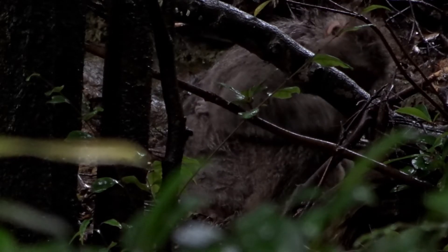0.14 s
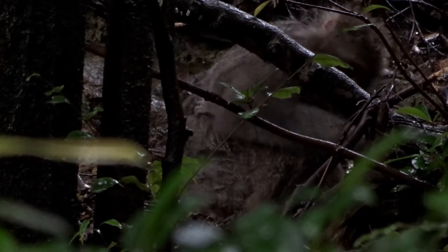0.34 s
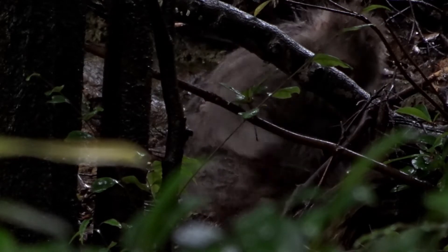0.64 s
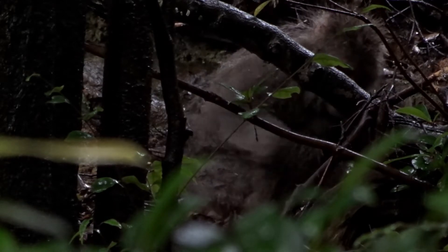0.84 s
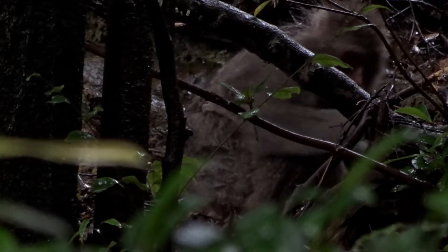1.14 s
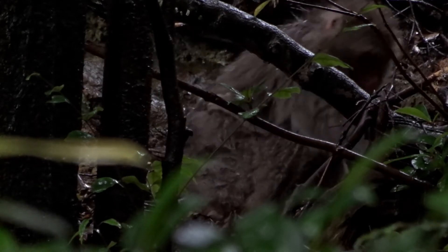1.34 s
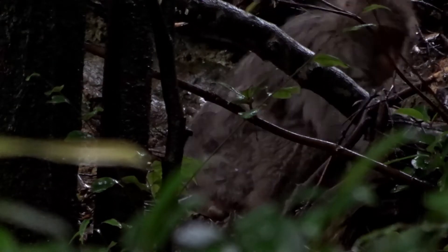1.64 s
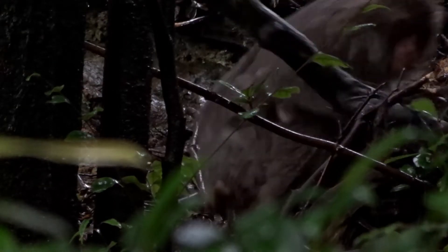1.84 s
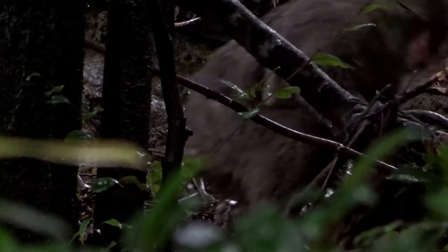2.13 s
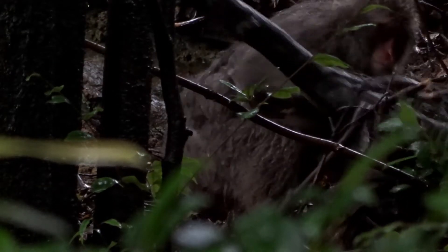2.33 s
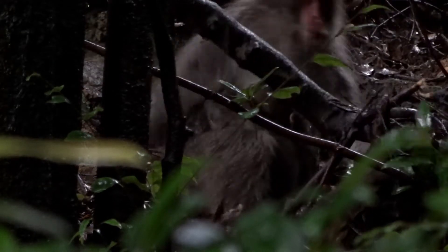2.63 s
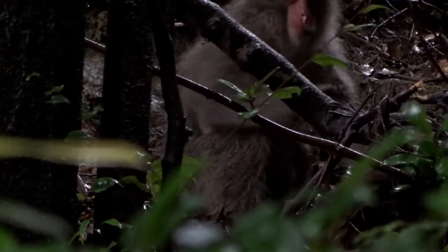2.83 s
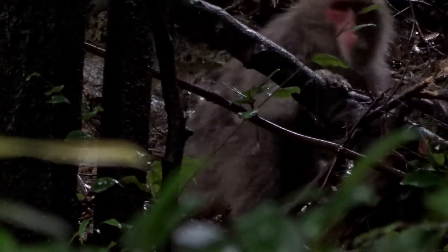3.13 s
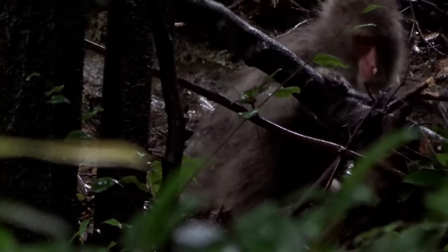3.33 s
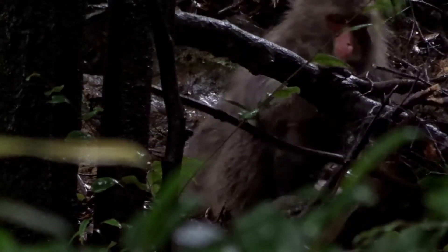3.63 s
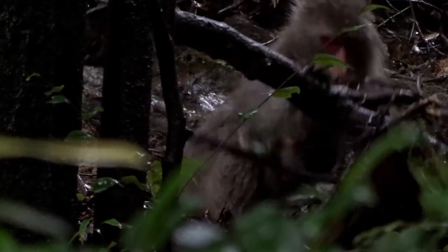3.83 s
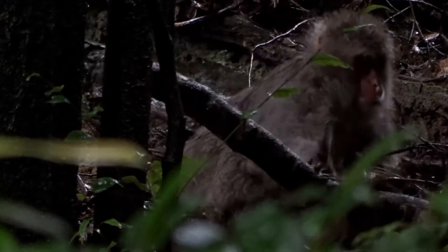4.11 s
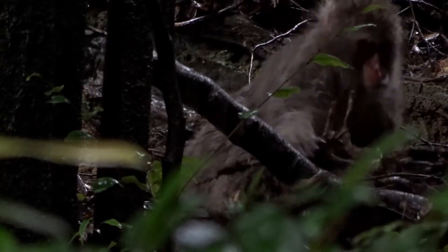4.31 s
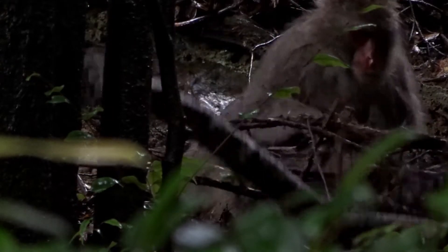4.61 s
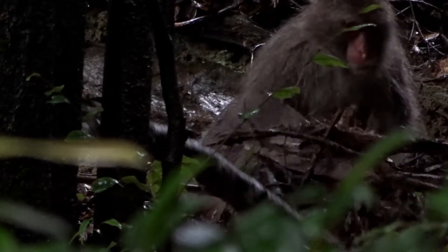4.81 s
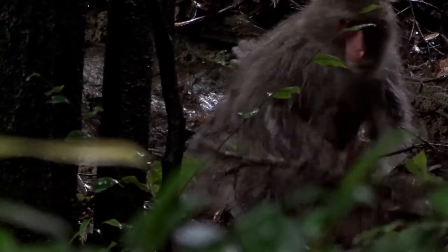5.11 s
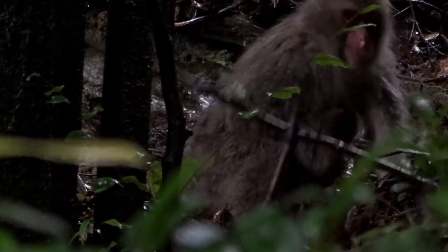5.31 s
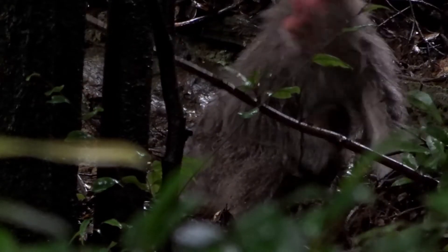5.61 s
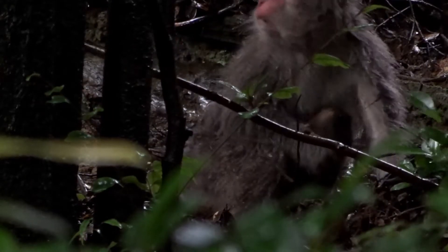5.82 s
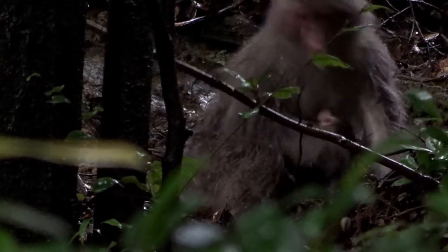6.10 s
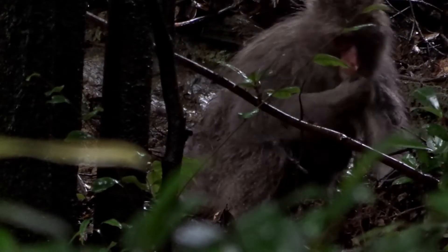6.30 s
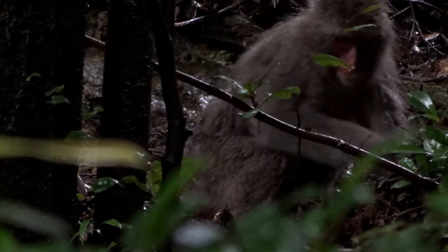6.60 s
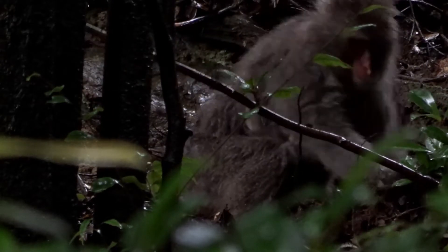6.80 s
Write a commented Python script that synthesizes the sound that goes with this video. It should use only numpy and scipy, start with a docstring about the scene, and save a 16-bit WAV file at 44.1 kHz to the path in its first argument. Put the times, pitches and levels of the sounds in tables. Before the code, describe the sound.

Continuous light rain surrounds the listener, a thin airy wash with fine leaf patter that gathers and loosens slightly. Crisp single drips click close by, left, right and centre. Now and then wet wood or litter is knocked by a monkey among the branches, a short crackling snap with a grainy woodland tail. Outdoors, stereo, with low rumble removed.

```python
"""A forest in steady rain, heard by two close microphone ports with the bass cut.
Shaped noise makes a far wash, and many short tones make a patter of drops on leaves all round.
Single ticks are brief tones in a puff of noise: near drops with their spray, and crackle in the knocks.
Duller knocks of wet wood and litter further off are a snap and a short tail of grainy noise,
the sound that the trunks scatter."""
import sys
import numpy as np
from scipy import signal
from scipy.io import wavfile
from scipy.ndimage import uniform_filter1d

SR = 44100
rng = np.random.default_rng(int(sys.argv[2]) if len(sys.argv) > 2 else 0)


def nominal_scale(level):
    """Amplitude ratio for a level in decibels (scalar or array-like)."""
    x = np.asarray(level, float) / 20
    return 10 ** x


def transcribe(signal):
    """Save signal, clipped to [-1, 1], as a 16-bit WAV file at the path in sys.argv[1]."""
    frames = np.atleast_2d(signal).T
    limited = np.clip(frames, -1, 1)
    pcm = np.round(limited * 32767).astype(np.int16)
    wavfile.write(sys.argv[1], SR, pcm)


N = 306495  # length of the scene in samples

# Colour of the far wash before the bass cut: (frequency [Hz], relative level [dB])
WASH_COLOUR = [(150, -12), (240, -16.5), (460, -7.5), (650, -2.5), (1090, -2), (1350, 1), (2900, 1),
               (4540, 1.5), (5800, -2), (7400, -5), (10000, -6.5), (12300, -8), (14500, -10.5),
               (16000, -15)]
# Slow drift of the wash before the bass cut: (time [s], rms level [dB])
WASH_DRIFT = [(0.0, -40), (0.6, -41), (2.1, -40.5), (2.75, -41), (6.95, -41)]
# How alike the two ports hear sound from all round, swinging with the port gap in wavelengths:
# (frequency [Hz], likeness [-1 to 1])
PORT_LIKENESS = [(150, .85), (600, .86), (1200, .71), (2000, .56), (3000, .55), (4000, .28), (5000, -.02),
                 (6000, -.27), (7500, -.33), (9000, -.18), (10000, .08), (11500, .26), (13500, .15),
                 (15000, 0)]
# Groups of small drops on leaves, levels before the bass cut: (lowest pitch [Hz], highest pitch [Hz],
# usual rate [drops/s], size spread [dB], rms level [dB], rise [cycles])
LEAF_DROPS = [(484, 2112, 900, 5, -59.5, 4.3), (1800, 6000, 1900, 3, -54.5, 14),
              (6000, 15000, 990, 3.5, -59.5, 4.2), (4000, 7700, 150, 3., -54.5, 0.81)]
# Single ticks: near drops, and the crackle inside the knocks, levels before the bass cut:
# (time of tick [s], tick level [dB], ring [Hz], direction [-1 left to 1 right])
SINGLE_TICKS = [(0.1051, -35, 13800, .6), (0.185, -31, 11800, .5), (0.2005, -28, 9800, 0.27),
                (0.2907, -29.5, 11670, 0), (0.3232, -28, 3420, 0), (0.7664, -31.5, 10400, 0),
                (0.805, -26, 3400, 0), (0.8094, -32, 11180, .6), (0.8205, -22, 9800, 0.91),
                (0.8219, -26, 3760, 0.05), (0.838, -37, 2840, .2), (0.8475, -33, 1480, .2),
                (0.8542, -31, 10510, -.14), (1.0537, -32, 3330, .2), (1.1525, -35, 10500, -.8),
                (1.2266, -21, 3670, .2), (1.2337, -19.5, 8200, 0.33), (1.4619, -32, 7360, -.4),
                (1.9273, -30, 8230, 0), (2.0199, -31, 10790, 0.56), (2.0653, -28, 9870, -.18),
                (2.148, -31, 8400, .41), (2.351, -35, 9760, .1), (2.3862, -29, 7100, 0),
                (2.3864, -27, 4000, 0), (2.3871, -29, 1610, -.2), (2.6166, -36, 9500, -.8),
                (2.8727, -36, 8200, 0), (2.9222, -31, 11450, -.8), (2.9562, -37, 9910, .4),
                (3.0129, -36, 10560, 0), (3.0869, -33, 9700, 0), (3.1707, -30.5, 7860, 0),
                (3.4112, -31, 10920, -.49), (3.4156, -31, 10100, -.98), (3.4949, -35, 12030, 0),
                (3.552, -31, 9730, .88), (3.5771, -32, 9450, .98), (3.6794, -29, 11600, 0),
                (3.9366, -39, 9880, 0), (3.9444, -25, 2780, 0), (3.9484, -23.5, 1680, -.2),
                (3.9506, -21, 2780, 0.076), (3.982, -25, 1400, 0), (4.0889, -36, 10950, -.8),
                (4.3012, -34, 13000, -.6), (4.3535, -35, 11050, 0.88), (4.4004, -33, 9250, -.12),
                (4.6139, -36, 11290, -.8), (4.6353, -47, 10890, 0), (5.1618, -31, 10480, -.8),
                (5.2001, -33, 8200, 0), (5.355, -23, 3080, 0), (5.367, -34, 8490, -.4),
                (5.3688, -31, 1710, 0), (5.3733, -26, 3580, 0), (5.4738, -28, 4200, 0),
                (5.6148, -30, 3800, .2), (5.6494, -29, 8600, 0), (5.745, -31.5, 6640, 0),
                (5.761, -32, 10010, 0.68), (5.7826, -36, 11460, 0), (6.088, -38, 10200, -0.32),
                (6.3295, -28.5, 9700, -0.0039), (6.4059, -35, 11980, -.75), (6.6484, -36, 9710, .26),
                (6.8853, -32, 4330, 0), (6.8974, -36, 7600, 0)]
# Far knocks, levels before the bass cut:
# (time [s], level [dB], centre [Hz], spread [Hz], time to fade 60 dB at 1330 Hz [s])
FAR_KNOCKS = [(0.245, -35, 3230, 900, 0.5), (0.305, -33, 3400, 900, 0.21), (0.584, -33.5, 970, 600, 0.14),
              (0.803, -25, 2340, 1900, 0.39), (1.0, -35, 2500, 1800, 0.46), (1.919, -33, 4300, 700, 0.2),
              (2.385, -33.5, 1700, 900, 0.11), (3.075, -36, 6000, 2500, 0.4),
              (3.943, -23, 2350, 1700, 0.37), (4.331, -41.5, 610, 352, 0.36),
              (4.745, -36.5, 700, 500, 0.38), (4.831, -34.5, 2500, 1500, 0.38),
              (5.3541, -27.5, 3170, 1600, 0.45), (5.603, -30, 1930, 1500, 0.73),
              (5.805, -38, 587, 400, 0.13), (6.496, -38, 1010, 900, 0.32), (6.879, -35, 4200, 800, 0.15)]

PORT_GAP_S = 0.0001  # travel time between the ports for a sound from the side
LEAN_S = 0.000015  # the rain is a little denser on the right, so the left port hears it later


def evened(x):
    """Scales a sound or a random curve to rms 1."""
    return x / np.sqrt(np.mean(x ** 2) + 1e-20)


def read(points, hz):
    """Reads a table between its points, on a log-frequency axis."""
    f, value = np.transpose(points)
    return np.interp(np.log(hz + 1), np.log(f + 1), value)


def add(mix, start_s, sound):
    """Mixes a two-channel sound in from start_s, cutting it off at the end of the mix."""
    part = mix[:, max(round(start_s * SR), 0):][:, :sound.shape[1]]
    part += sound[:, :part.shape[1]]


def diffuse(frames, hz):
    """Random spectra for both ports, as alike at each frequency as sound from all round."""
    a, b, c, d = rng.standard_normal((frames, len(hz), 4)).T
    left, other = a + 1j * b, c + 1j * d
    same = read(PORT_LIKENESS, hz)[:, None]
    lead = np.exp(2j * np.pi * hz * LEAN_S)[:, None]  # the right port hears it earlier
    right = same * lead * left + np.sqrt(1 - same ** 2) * other
    return np.array([left, right])


def burst(frames, hz, shape):
    """Short noise from all round whose spectrum and decay follow shape (frequencies x frames)."""
    spectra = diffuse(frames, hz) * shape
    noise = signal.istft(spectra, nperseg=128, noverlap=96)[1]
    return noise / np.sqrt(np.mean(shape.max(1) ** 2) * 50)


def grain(hz, cycles, lag_s, phase):
    """A few cycles of tone that rise and fall quickly, reaching the left port lag_s late."""
    delay_s = PORT_GAP_S + np.array([[lag_s / 2], [-lag_s / 2]])
    t = np.maximum(np.arange(256) / SR - delay_s, 0)
    u = t * hz / cycles  # reaches 1 at the top of the rise
    envelope = (u * np.exp(1 - u)) ** 2
    return envelope * np.sin(2 * np.pi * hz * t + phase)


def wash():
    """Countless far drops blur into noise with drifting patches and a flicker shared by all pitches."""
    frames, hz = N // 128 + 5, np.fft.rfftfreq(512, 1 / SR)
    spectra = diffuse(frames, hz)
    patches = rng.standard_normal((frames, 257)).T
    patches = uniform_filter1d(patches, 10, 0)  # smooth across pitch
    patches = evened(uniform_filter1d(patches, 20, 1))  # smooth across time
    flicker = evened(uniform_filter1d(rng.standard_normal(frames), 12))
    spectra *= nominal_scale(read(WASH_COLOUR, hz)[:, None] + 0.93 * patches + 0.25 * flicker)
    noise = signal.istft(spectra, nperseg=512, noverlap=384)[1][:, :N]
    drift_db = np.interp(np.arange(N) / SR, *np.transpose(WASH_DRIFT))
    return nominal_scale(drift_db) * evened(noise)


def patter(low_hz, high_hz, per_s, spread_db, level_db, cycles, clumps):
    """Drops of random size strike leaves of many pitches and directions, more often in the clumps."""
    leaves = 16
    falls = rng.random(N) < clumps * per_s / SR  # the moments when a drop lands
    size = falls * nominal_scale(spread_db * np.minimum(rng.exponential(1, N), 4))
    leaf = rng.integers(0, leaves, N)  # which leaf a drop at that moment would hit
    sides = rng.permutation(np.linspace(-1, 1, leaves))
    out = np.zeros((2, N))
    for k, hz in enumerate(np.geomspace(low_hz, high_hz, leaves)):
        tap = grain(hz, cycles, PORT_GAP_S * sides[k], k)
        hits = size * (leaf == k)
        out += signal.oaconvolve(hits[None], tap, axes=1)[:, :N]
    return nominal_scale(level_db) * evened(out)


def tick(s, db, ring_hz, side):
    """A near drop or a crackle: fine spray gathers for a few ms, with a brief tone at its top."""
    hz, t = np.fft.rfftfreq(128, 1 / SR)[:, None], np.arange(200) * 32 / SR
    lead_s, t60 = 160 / SR, 0.11  # time to gather, then time to fade 60 dB
    swell = np.minimum(0.1 + t / lead_s, 1) * nominal_scale(-60 * np.maximum(t - lead_s, 0) / t60)
    colour = np.exp(-0.5 * (np.log((hz + 1) / ring_hz) / 0.42) ** 2)
    air = 1 / (1 + (hz / 22400) ** 4)  # the finest hiss does not carry
    # spray against its tick: -9 dB for a tick of -32 dB, less for louder ticks
    spray_db = -9 - 0.33 * (db + 32)
    sound = nominal_scale(spray_db) * burst(len(t), hz[:, 0], colour * air * swell)
    cycles = 2.3 * (ring_hz / 9500) ** 0.7  # cycles of rise; lower leaves ring fewer
    tap = grain(ring_hz, cycles, side * PORT_GAP_S, 2 * np.pi * rng.random())
    add(sound, lead_s - cycles / ring_hz, tap)
    return s - lead_s, nominal_scale(db) * sound


def faint_drops():
    """Gives rows like SINGLE_TICKS for faint near drops, at random moments."""
    per_s, level_db, spread_db = 3, -35.5, 2
    low_hz, high_hz = 7700, 11200
    when, size, pitch, side = rng.random((round(per_s * N / SR), 4)).T
    db = level_db + spread_db * (2 * size - 1)
    ring_hz = low_hz * (high_hz / low_hz) ** pitch
    return zip(when * N / SR, db, ring_hz, 2 * side - 1)


def knock(db, centre_hz, spread_hz, t60):
    """A far blow scattered by trunks: a snap, then grainy echoes that lose their treble first."""
    hz, t = np.fft.rfftfreq(128, 1 / SR)[:, None], np.arange(500) * 32 / SR
    rise_s = 0.0074  # pace of the rise; the echoes start at 0.4 of full strength
    low_cut = hz ** 2 / (hz ** 2 + 600 ** 2)
    colour = np.exp(-0.5 * ((hz - centre_hz) / spread_hz) ** 2) * low_cut
    echoes = nominal_scale(1.96 * rng.standard_normal(len(t))) * np.minimum(0.4 + t / rise_s, 1)
    decay = nominal_scale(-60 * t / t60 * ((hz + 300) / 1630) ** 0.53)  # high pitches fade faster
    sound = nominal_scale(-5.5) * burst(len(t), hz[:, 0], colour * echoes * decay)
    snap = 0.0048 / rise_s  # a slow rise softens the snap
    sound[:, :256] += nominal_scale(0.5) * snap * grain(centre_hz, 0.91, 0, 2 * np.pi * rng.random())
    return nominal_scale(db) * sound


def scene():
    """Lays down the wash and the patter, then the single ticks and the knocks."""
    bunches = evened(uniform_filter1d(rng.standard_normal(N), 1500))
    clumps = nominal_scale(3.5 * bunches)  # leaves shed drops in bunches
    mix = wash() + sum(patter(*row, clumps) for row in LEAF_DROPS)
    for row in [*SINGLE_TICKS, *faint_drops()]:
        add(mix, *tick(*row))
    for s, *row in FAR_KNOCKS:
        add(mix, s, knock(*row))
    return mix


def top_cut(x):
    """Nothing passes above the cut-off."""
    return signal.sosfilt(signal.butter(12, 16360, fs=SR, output="sos"), x)


def record(dry):
    """The ports: a steep bass cut against wind and a slightly louder left side."""
    bass_cut = signal.butter(4, 300, "high", fs=SR, output="sos")
    cut = signal.sosfilt(bass_cut, dry)
    finished = cut * nominal_scale([[0.25], [-0.25]])  # left, right [dB]
    return top_cut(finished)


dry = scene()
out = record(dry)
transcribe(out)
```